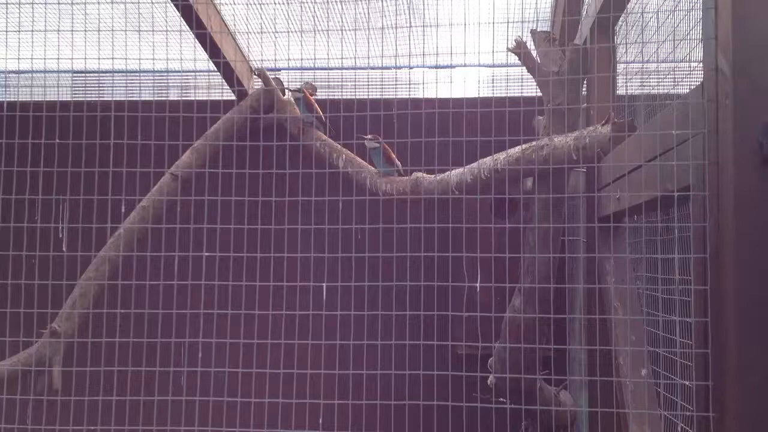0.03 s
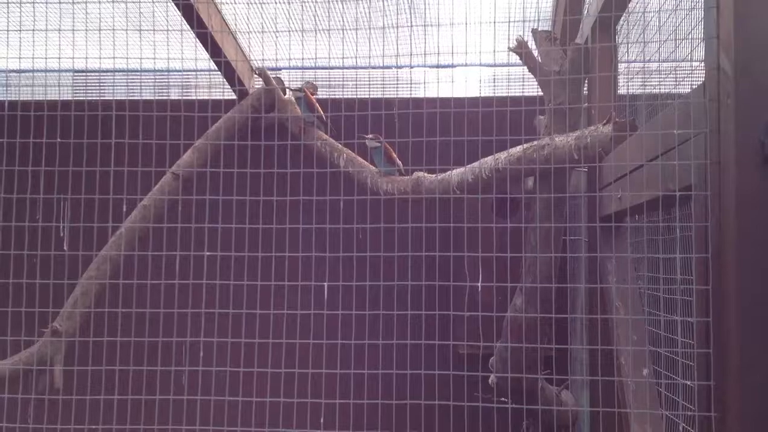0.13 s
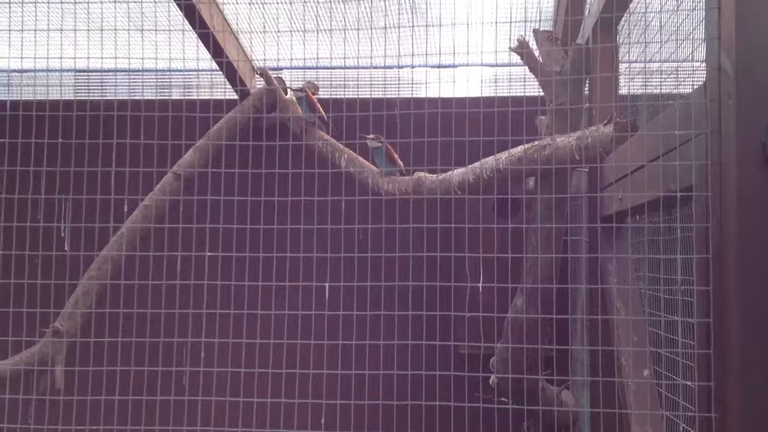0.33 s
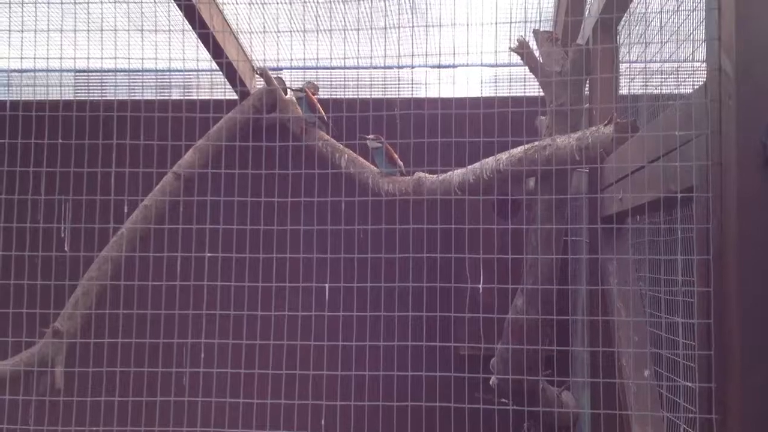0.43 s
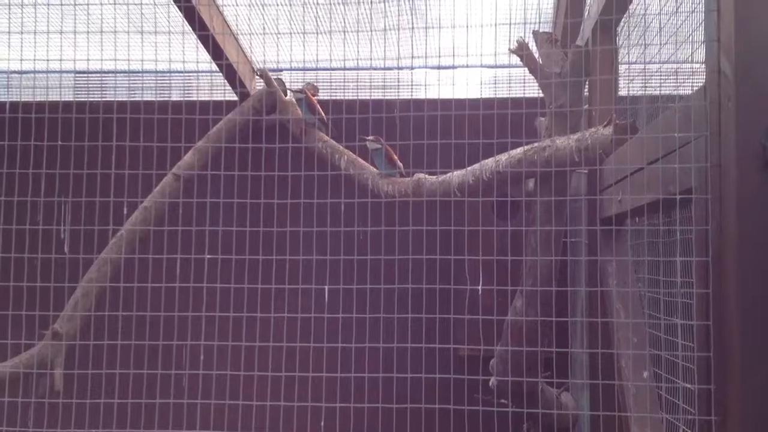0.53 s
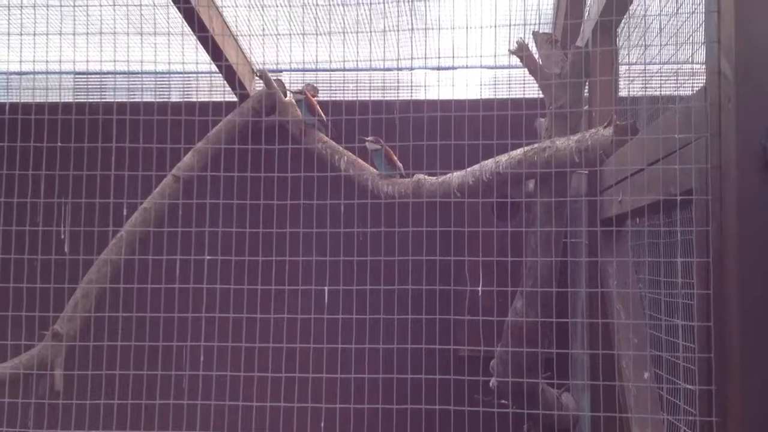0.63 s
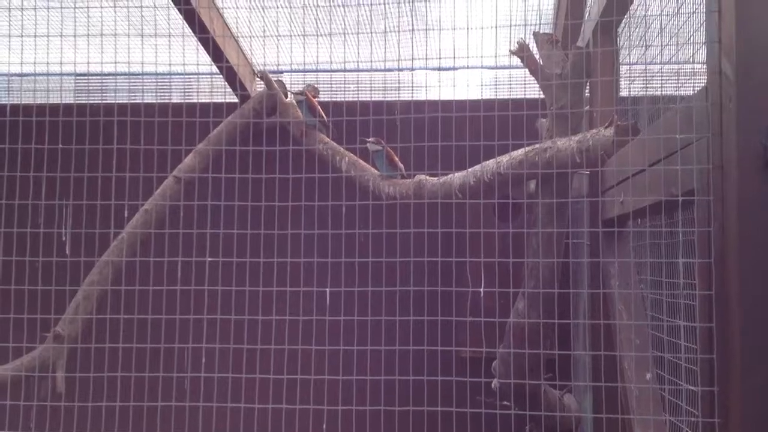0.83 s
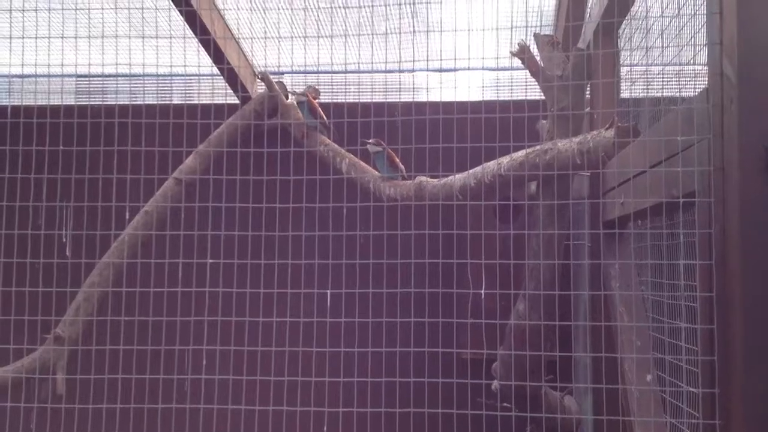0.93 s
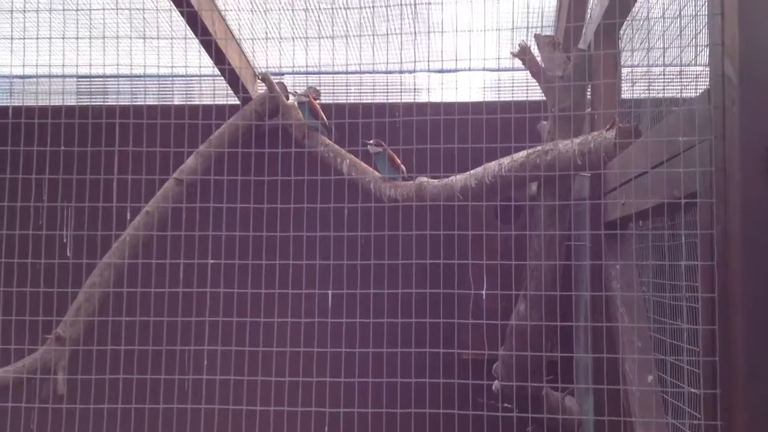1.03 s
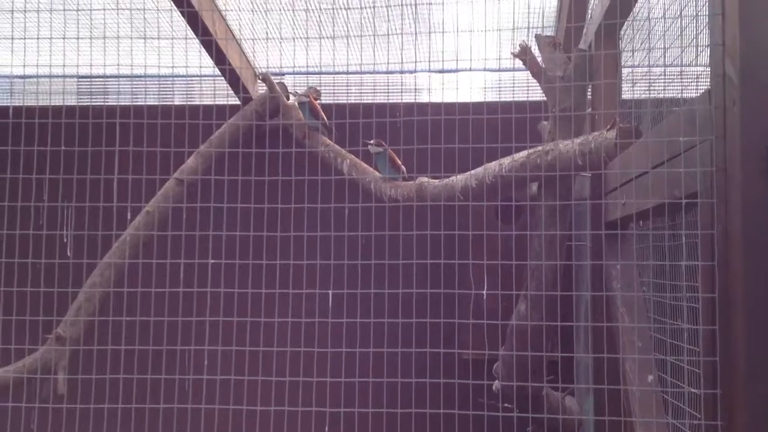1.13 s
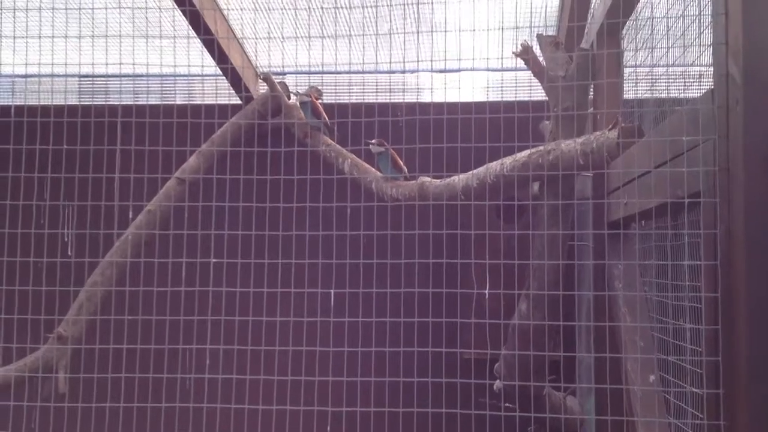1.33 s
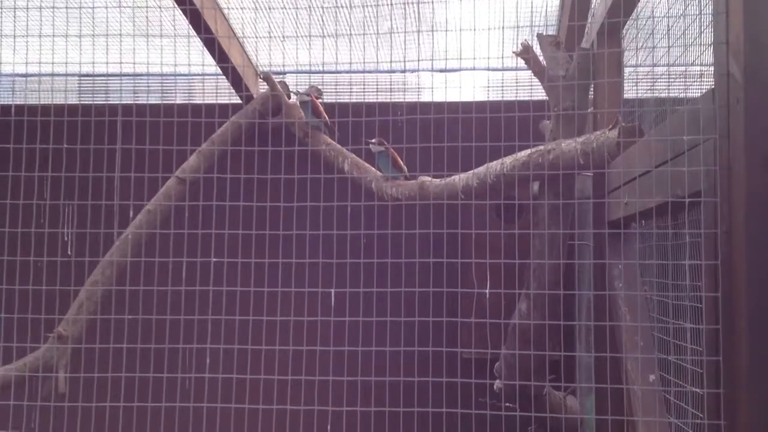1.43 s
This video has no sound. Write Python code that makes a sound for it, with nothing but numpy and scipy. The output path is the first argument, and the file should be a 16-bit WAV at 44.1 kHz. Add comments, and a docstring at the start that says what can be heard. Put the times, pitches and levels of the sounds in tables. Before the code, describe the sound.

Small birds call in a wire-and-board aviary: a high whistle and two warbled chirps, an abrupt silence, held whistles, a faint croak, then a rapid descending trill, with short board echoes and low hum.

```python
"""After 0.12 s of silence a thin high whistle and two warbled chirps burst in over a low outdoor hum.
Small birds in a wire-and-board aviary: a second silence, then held whistles, a far croak and a trill that sinks
and fades. Bird calls are gliding sine tones with a breathy flutter and faint overtones; the croak is pulses
through a throat; far twitter is a blur of random notes. Air and rustle are coloured noise, with a faint steady
tone in the hum. The boards echo every call."""
import sys
import numpy as np
from scipy import signal
from scipy.fft import rfft, irfft
from scipy.io import wavfile
from scipy.ndimage import uniform_filter1d

SR = 44100
rng = np.random.default_rng(int(sys.argv[2]) if len(sys.argv) > 2 else 0)


def int16_out(signal):
    """Quantize to a 16-bit WAV file."""
    q = np.round(np.clip(np.atleast_2d(signal).T, -1, 1) * 32767)
    wavfile.write(sys.argv[1], SR, q.astype(np.int16))


N = 66150
T = np.arange(N) / SR  # time of each sample, in seconds
TOP_HZ = 15350  # nothing is kept above this pitch

# strength of the 2nd, 3rd and 4th harmonics of a call: level_db
OVERTONES_DB = [-34.5, -61, -37.5]

# breathy flutter shared by all calls: slow noise with a spread near 1
RASP_HZ = 460  # fastest flutter
FLUTTER_FILTER = signal.butter(4, RASP_HZ, fs=SR, output="sos")
FLUTTER = np.sqrt(SR / 2 / RASP_HZ) * signal.sosfilt(FLUTTER_FILTER, rng.standard_normal(2 * N))


def undb(db):
    """Turns decibels into a plain multiplier."""
    return 10 ** (np.asarray(db) / 20)


def level(x, db):
    """Scales a sound to an average (rms) level in dB."""
    return x * undb(db) / np.sqrt(np.mean(x ** 2))


def curve(table):
    """Joins the points of a (time, value) table with straight lines."""
    s, value = np.array(table).T
    return np.interp(T, s, value)


def walk(rate):
    """Slow random curve, spread near 1, from `rate` random values a second, smoothed twice."""
    k = int(SR / rate)
    steps = np.repeat(rng.standard_normal(N // k + 1), k)
    return 1.3 * uniform_filter1d(uniform_filter1d(steps, k), k)[:N]


def coloured(table):
    """Noise whose spectrum follows a (Hz, dB) table, rms 1."""
    hz, db = np.array(table).T
    f = np.maximum(np.arange(N // 2 + 1) * SR / N, 1)
    colour = undb(np.interp(np.log(f), np.log(hz), db))
    return level(irfft(rfft(rng.standard_normal(N)) * colour, N), 0)


def voice(hz, gain, overtones_db):
    """A whistled sine tone with a breathy flutter, which breaks up its faint overtones."""
    rasp = 0.14  # depth of the flutter in the main tone
    overtone_top_db = -42  # overtones stop growing once a call is louder than this
    phase = 2 * np.pi * np.cumsum(hz) / SR
    overtones = 0
    for harmonic, db in enumerate(overtones_db, start=2):
        in_range = harmonic * hz < TOP_HZ
        overtones = overtones + undb(db) * np.sin(harmonic * phase) * in_range
    overtones = np.minimum(gain, undb(overtone_top_db)) * overtones
    # a short note takes a random piece of the flutter
    start = rng.integers(N) if len(hz) < N else 0
    flutter = FLUTTER[start:start + len(hz)]
    main_tone = gain * np.sin(phase) * (1 + rasp * flutter)
    return np.sqrt(2) * (main_tone + overtones * (1 + flutter))


def phrase_curves(rows):
    """Smooth pitch (Hz) and gain curves through a (s, Hz, dB) table, with soft ends."""
    s, hz, db = np.array(rows).T
    fade_s = 0.00193
    edge = np.clip(np.minimum(T - s[0], s[-1] - T) / fade_s, 0, 1)
    pitch = uniform_filter1d(np.interp(T, s, hz), size=90)
    gain = edge * undb(uniform_filter1d(np.interp(T, s, db), size=90))
    return pitch, gain


def notes(rows):
    """Short notes that glide from one pitch to another, from (s, length s, Hz, Hz, dB) rows."""
    edge_share = .27  # share of a note spent rising, and the same again falling
    out = np.zeros(N + SR)
    for s, length, start_hz, end_hz, db in rows:
        u = np.linspace(0, 1, int(length * SR))  # progress through the note
        shape = np.sin(np.pi / 2 * np.clip(np.minimum(u, 1 - u) / edge_share, 0, 1))
        pitch = start_hz + (end_hz - start_hz) * u
        i = int(s * SR)
        out[i:i + len(u)] += voice(pitch, shape * undb(db), OVERTONES_DB)
    return out[:N]


def boards(x, wet_db=0):
    """Adds quick echoes off the boards and a longer outdoor tail, both as fading noise."""
    # T60 is the time to fade by 60 dB; wet_db raises or lowers both base levels
    echo_t60_s, echo_base_db, echo_gap_s = 0.0896, -10.5, 0.0059
    tail_t60_s, tail_base_db = 0.57, -10.5
    t = T[:SR]
    echo = rng.standard_normal(SR) * undb(-60 * t / echo_t60_s) * (t > echo_gap_s)
    tail = rng.standard_normal(SR) * undb(-60 * t / tail_t60_s) * (t > 2 * echo_gap_s)
    reflections = level(echo, echo_base_db + wet_db) + level(tail, tail_base_db + wet_db)
    return x + signal.fftconvolve(x, reflections / np.sqrt(SR))[:N]


def air():
    """Low outdoor hum: coloured noise whose level flickers slowly, plus a faint tone of steady pitch."""
    # colour of the air noise: pitch_hz, relative level_db (per Hz)
    air_colour = [(30, -30.5), (75, -19.5), (120, -7), (250, 0.5), (400, -5), (600, -11.5), (1100, -14),
                  (2200, -18.5), (4500, -22.5), (7000, -27), (10000, -33.5), (13500, -32.5)]
    # loudness of the air noise: time_s, level_db
    air_level = [(.1, -57), (1.5, -60)]
    flicker_db = 1.77
    tone_hz, tone_mid_db = 699, -75
    tone = np.sqrt(2) * undb(tone_mid_db + 4.3 * walk(13.07)) * np.sin(2 * np.pi * tone_hz * T)
    return coloured(air_colour) * undb(curve(air_level) + flicker_db * walk(7.67)) + tone


def rustle():
    """Treble rustle: coloured noise with a quickly flickering level."""
    # colour of the rustle: pitch_hz, relative level_db
    rustle_colour = [(4000, -8.5), (5800, 0), (8000, -2.5), (10500, -13.5), (14000, -4.5)]
    # loudness of the rustle: time_s, level_db
    rustle_level = [(.84, -84), (.87, -65.5), (1.0, -69), (1.06, -59), (1.12, -70.5)]
    return coloured(rustle_colour) * undb(curve(rustle_level) + 1.5 * walk(90))


def whistles():
    """Thin held whistles: smooth pitch curves whose loudness wavers."""
    # one table per whistle: time_s, pitch_hz, level_db
    whistle_tables = [
        [(.592, 3830, -47), (.603, 3722, -41), (.672, 3715, -57), (.692, 3705, -48), (.703, 3690, -54),
         (.72, 3700, -51), (.765, 3660, -73)],
        [(.590, 3230, -51), (.62, 3172, -54.5), (.683, 3060, -52.5), (.75, 3023, -56.5), (.77, 3070, -71)],
        [(.118, 7940, -56), (.142, 7750, -48), (.155, 7780, -74), (.168, 7680, -61.5), (.25, 7800, -84)],
    ]
    out = np.zeros(N)
    for rows in whistle_tables:
        pitch, gain = phrase_curves(rows)
        out += voice(pitch, gain * undb(2.2 * walk(40)), OVERTONES_DB)
    return out


def twitter():
    """Many far birds: random short notes, blurred together by strong echoes."""
    # loudness of the whole twitter: time_s, level_db
    twitter_level = [(.12, -68), (.21, -49.5), (.31, -53.5), (.58, -51.5), (.63, -58), (.83, -53.5),
                     (.9, -44), (1.05, -50.5), (1.38, -66.5), (1.5, -94)]
    notes_per_s, note_s = 400, .01
    middle_hz, spread_hz = 3484, 391.4
    c = rng.standard_normal((int(notes_per_s * N / SR), 3))
    s = rng.random(len(c)) * N / SR
    start_hz = middle_hz + spread_hz * np.clip(c[:, 0], -1.8, 1.8)
    end_hz = start_hz + 250 * c[:, 1]
    x = notes(zip(s, np.full(len(c), note_s), start_hz, end_hz, 1.3 * c[:, 2]))
    return level(boards(x, wet_db=4.5), 0) * undb(curve(twitter_level))


def near_notes():
    """Short gliding notes of the near birds, including the sinking run that leads into the trill's end."""
    # one row per note: start_s, length_s, start_hz, end_hz, level_db
    near_note_rows = [(.122, 0.029, 4880, 4300, -58), (.172, 0.0092, 3810, 4000, -40.5),
                      (.247, 0.008, 3780, 3820, -43), (.256, 0.0066, 3400, 3910, -34.5),
                      (.264, 0.012, 4700, 4010, -52), (.286, 0.036, 2590, 2190, -60.5),
                      (.289, 0.027, 5300, 4760, -61), (.316, 0.0088, 4220, 4440, -42),
                      (.376, 0.054, 3303, 3378, -47), (.838, 0.015, 3300, 3310, -50.5),
                      (.849, 0.035, 3185, 2950, -42), (.860, 0.016, 3822, 3593, -32.5),
                      (.888, 0.013, 3784, 3834, -31), (.913, 0.006, 3520, 3850, -28.5),
                      (.918, 0.011, 3948, 3675, -30), (.941, 0.013, 3696, 3560, -33),
                      (.959, 0.0075, 3513, 4040, -29), (.965, 0.01, 3918, 3576, -30.5),
                      (.977, 0.0053, 3570, 3580, -29.5), (.983, 0.011, 3633, 3460, -34.5),
                      (.990, 0.018, 3423, 3460, -44.5), (.999, .012, 2968, 3060, -39.5),
                      (1.012, 0.013, 3055, 3180, -41.5), (1.033, 0.012, 3270, 3120, -44),
                      (1.046, 0.014, 3156, 3058, -39), (1.056, 0.0086, 3000, 2890, -36),
                      (1.074, 0.0063, 3040, 3260, -37), (1.086, 0.0057, 3170, 2650, -36.5),
                      (1.097, 0.012, 2880, 2760, -40), (1.114, 0.0174, 2940, 2744, -42),
                      (1.136, 0.0056, 3030, 2760, -48), (1.158, 0.011, 2820, 3020, -43.5),
                      (1.213, 0.0059, 3200, 3900, -47.5)]
    return notes(near_note_rows)


def chirps():
    """Warbled chirps: fast pitch curves made slightly unsteady, with brighter overtones."""
    # one table per chirp: time_s, pitch_hz, level_db
    chirp_tables = [
        [(.144, 3000, -50), (.150, 3633, -31), (.1565, 3710, -30), (.160, 3270, -38.5), (.169, 3060, -35),
         (.175, 2710, -59), (.183, 2940, -37), (.197, 2946, -39.5), (.203, 3330, -64.5)],
        [(.312, 3000, -54.5), (.318, 3448, -47), (.323, 3772, -29.5), (.328, 3392, -36), (.333, 3726, -26.5),
         (.337, 3380, -45.5), (.341, 3464, -33), (.347, 2978, -45.5), (.352, 3850, -36.5), (.360, 3305, -42),
         (.370, 3367, -40.5), (.380, 3283, -46)],
    ]
    # strength of the 2nd, 3rd and 4th harmonics: level_db
    chirp_overtones_db = [-30, -48, -30.5]
    wobble = 0.0094  # pitch unsteadiness, as a share of the pitch
    out = np.zeros(N)
    for rows in chirp_tables:
        pitch, gain = phrase_curves(rows)
        out += voice(pitch * (1 + wobble * walk(150)), gain, chirp_overtones_db)
    return out


def croak():
    """A far croak: rough, unsteady pulses ring the resonances of a throat, then swell and fade."""
    # pitch_hz, level_db (before the swell)
    croak_pitch_and_level = (300, -53)
    # throat resonances: pitch_hz, width_hz, level_db
    throat = [(1364, 73, 0.5), (1800, 540, -4), (2360, 630, -7)]
    roughness = 0.12  # noise mixed into pulses of height 1
    start_s, length_s = .63, .14
    hz, db = croak_pitch_and_level
    cycles = np.cumsum(hz * (1 + 0.019 * walk(80))) / SR
    # one click for each completed cycle
    pulses = np.diff(np.floor(cycles), prepend=0) + roughness * rng.standard_normal(N)
    x = np.zeros(N)
    for f, width, g in throat:
        b, a = signal.iirpeak(f, f / width, SR)
        x += undb(g) * signal.lfilter(b, a, pulses)
    x = signal.sosfilt(signal.butter(2, 3000, fs=SR, output="sos"), x)  # dull the top
    swell = np.sin(np.pi * np.clip((T - start_s) / length_s, 0, 1)) ** 2
    return level(x, db) * swell


def trill():
    """The fading end of the trill: regular beats of three notes, each a little different."""
    # loudness of the beats: time_s, level_db
    trill_level = [(1.18, -47.5), (1.35, -50.5), (1.39, -65)]
    # low hook, high pip, slide back down: delay_s, length_s, start_hz, end_hz, relative level_db
    beat_notes = [(-.011, .012, 2760, 3103, -2), (0, 0.0043, 3410, 3640, 3), (.007, .010, 3650, 2950, -5)]
    first_s, beat_s, beats = 1.1815, .0245, 9
    c = rng.standard_normal((beats, len(beat_notes), 3))
    rows = []
    for i, t in enumerate(first_s + beat_s * np.arange(beats)):
        beat_db = np.interp(t, *np.array(trill_level).T)
        for k, (delay, length, start_hz, end_hz, db) in enumerate(beat_notes):
            s = t + delay + .001 * c[i, k, 0]
            shift_hz = 45 * c[i, k, 1]
            note_db = beat_db + db + 1.68 * c[i, k, 2]
            rows.append((s, length, start_hz + shift_hz, end_hz + shift_hz, note_db))
    return notes(rows)


def scene():
    """Mixes the echoing calls with the far twitter, air and rustle."""
    birds = boards(near_notes() + chirps() + croak() + trill())
    held = boards(whistles(), wet_db=-0.5)
    return (birds + held + twitter() + air() + rustle())[None]


def record(dry):
    """The sound cuts in and out, leaving a faint short tail at the cut; the extreme treble is removed."""
    # stretches when the sound is on: start_s, end_s
    sound_on = [(.1195, .4255), (.5635, 2)]
    tail_s, tail_db = .017, -22
    gate = np.zeros(N)
    for start, end in sound_on:
        tail = (T >= end) & (T < end + tail_s)
        gate += (T >= start) * ((T < end) + undb(tail_db) * tail)
    gate = uniform_filter1d(gate, size=40)  # soften the switching
    return signal.sosfilt(signal.ellip(10, .2, 70, TOP_HZ, fs=SR, output="sos"), dry * gate)


dry = scene()
out = record(dry)
int16_out(out)
```